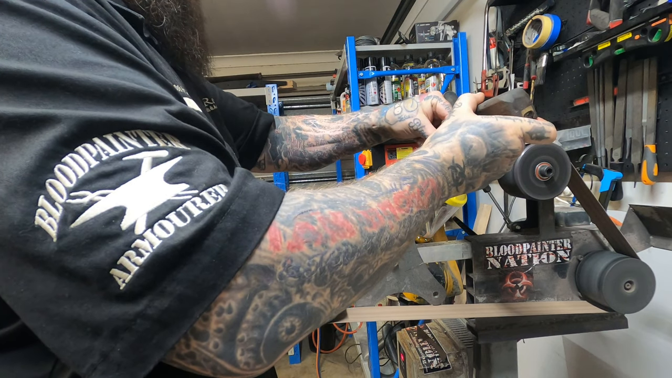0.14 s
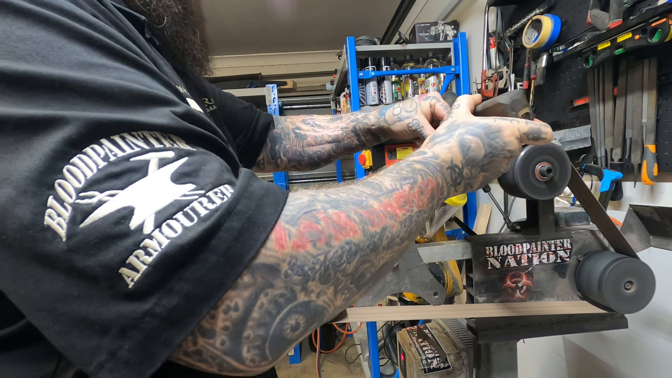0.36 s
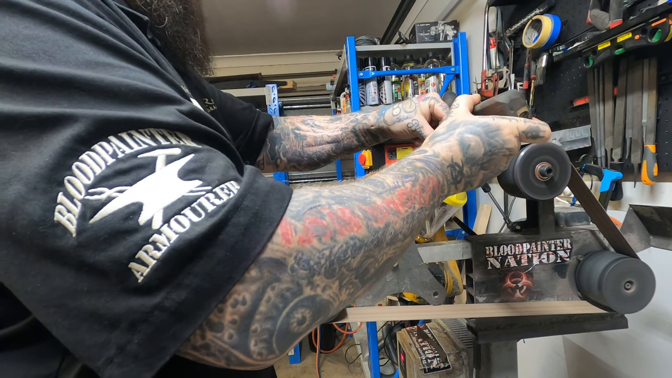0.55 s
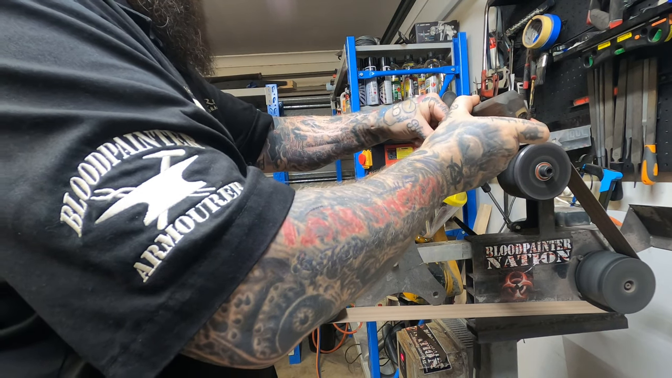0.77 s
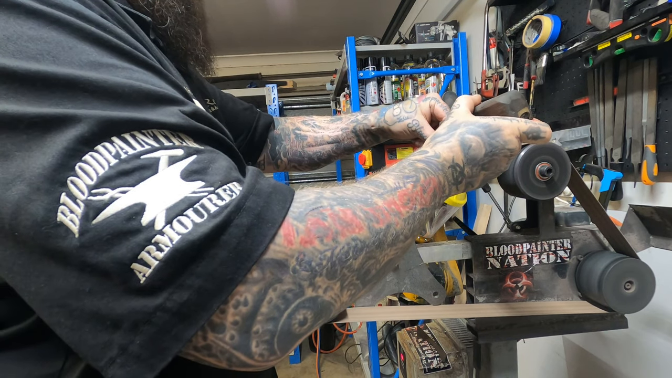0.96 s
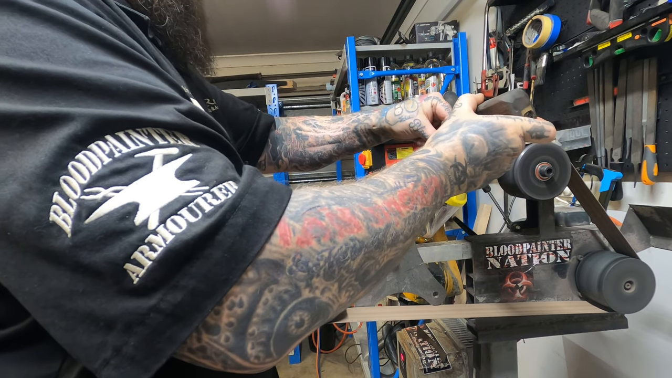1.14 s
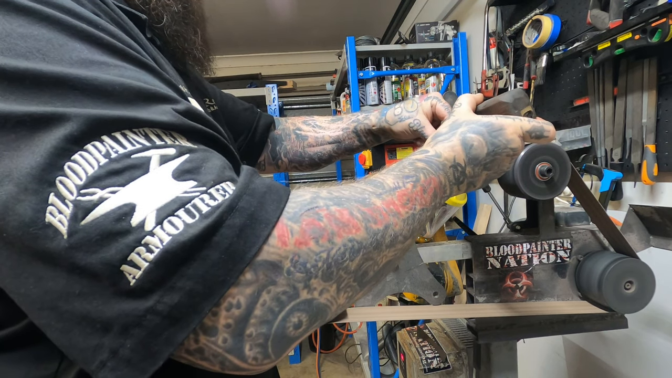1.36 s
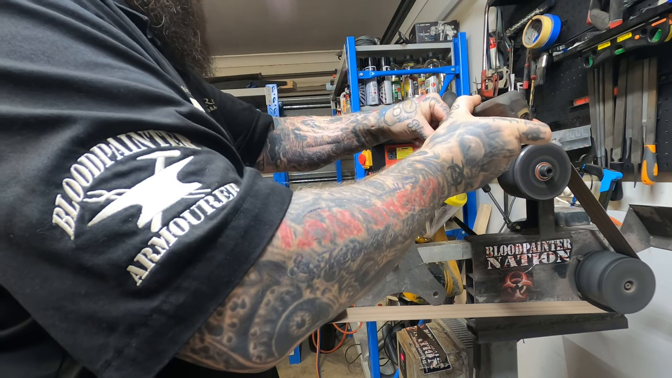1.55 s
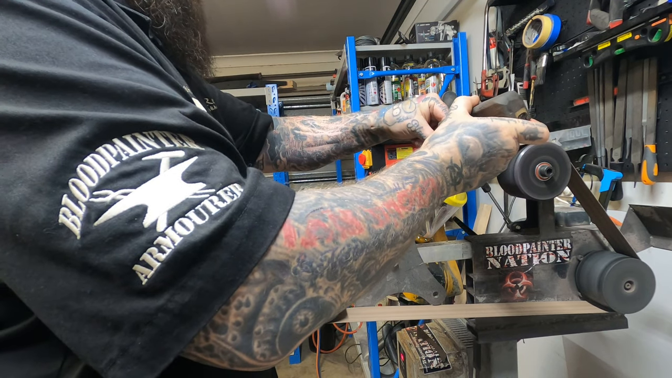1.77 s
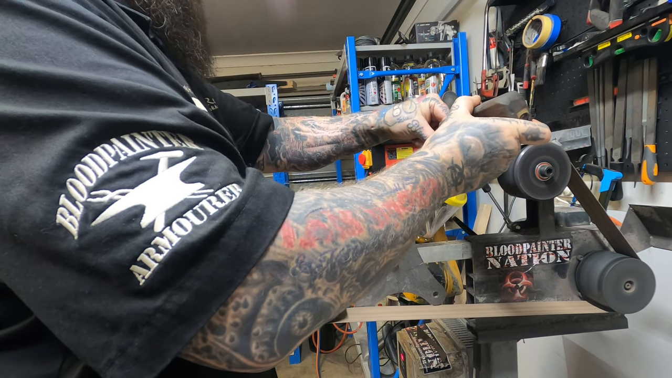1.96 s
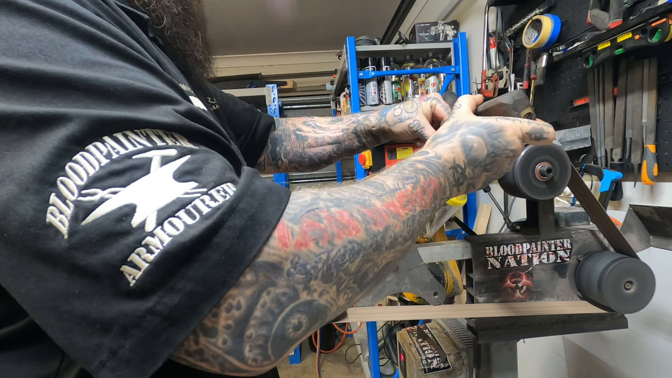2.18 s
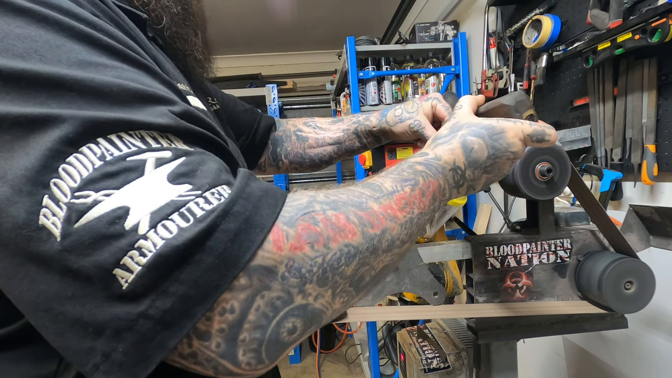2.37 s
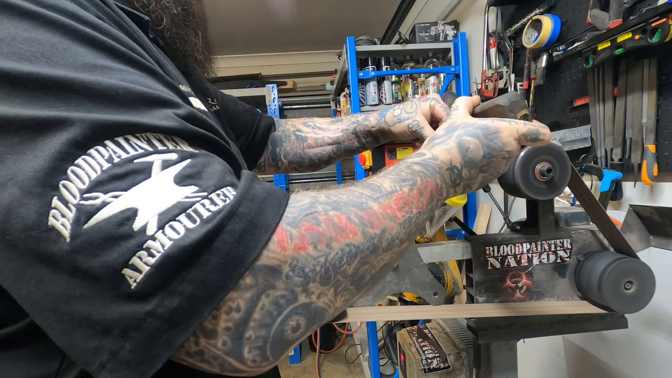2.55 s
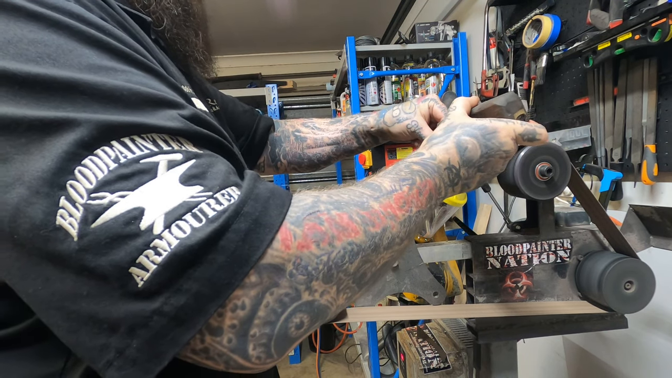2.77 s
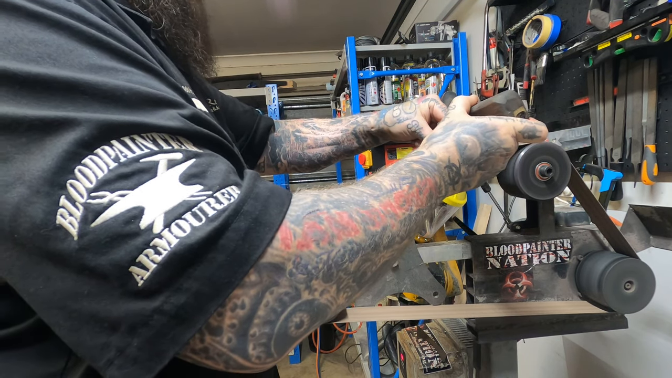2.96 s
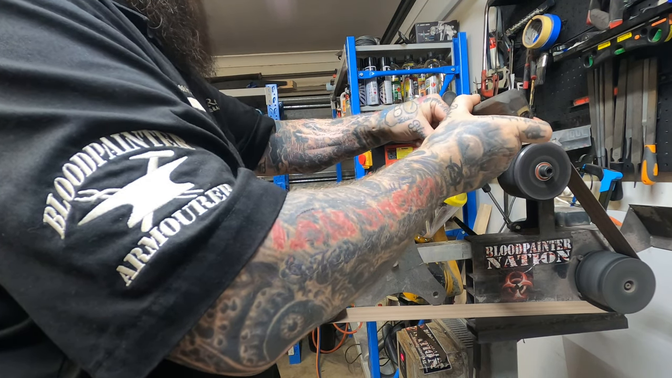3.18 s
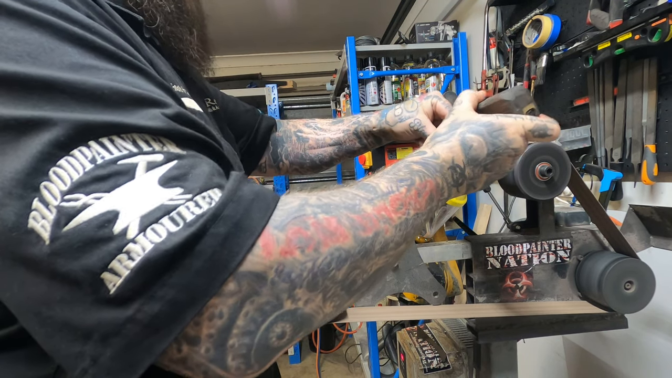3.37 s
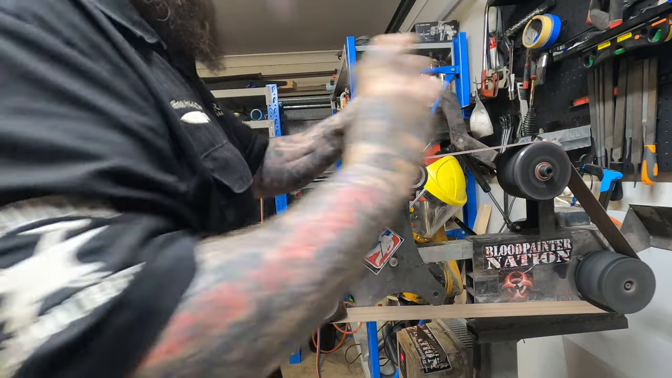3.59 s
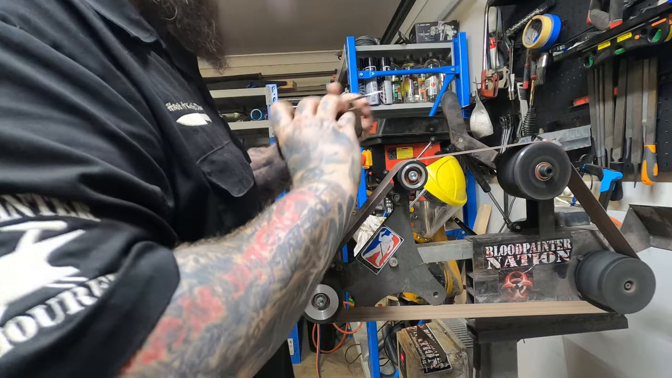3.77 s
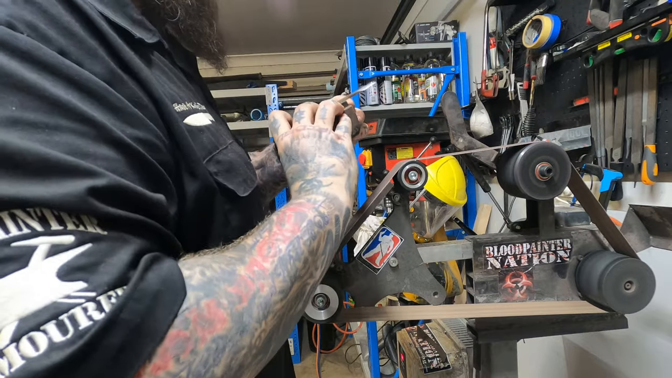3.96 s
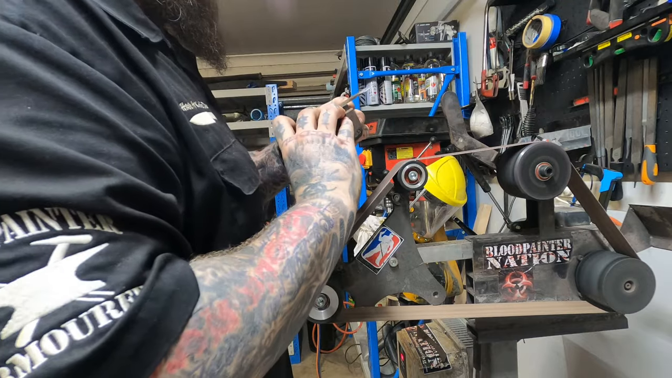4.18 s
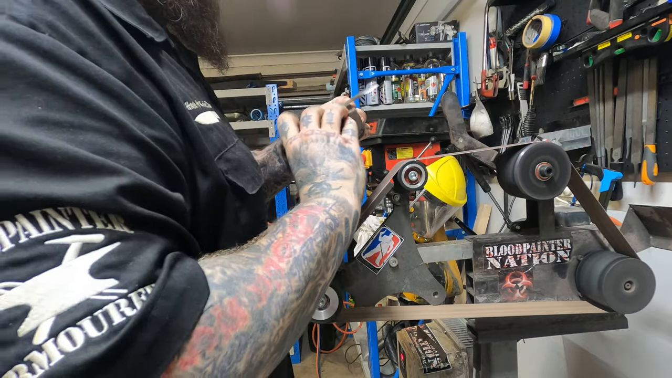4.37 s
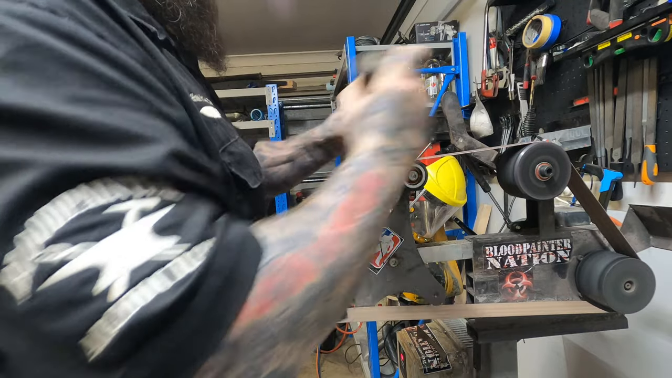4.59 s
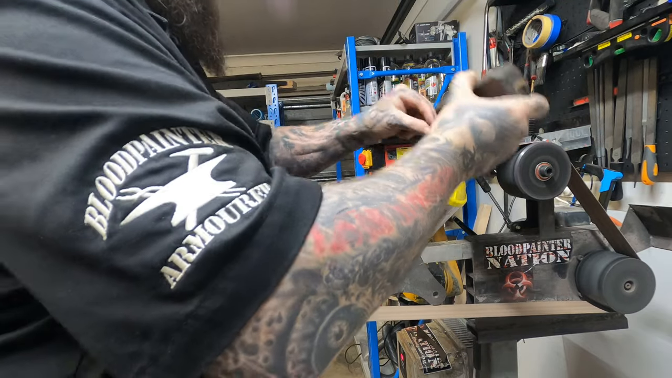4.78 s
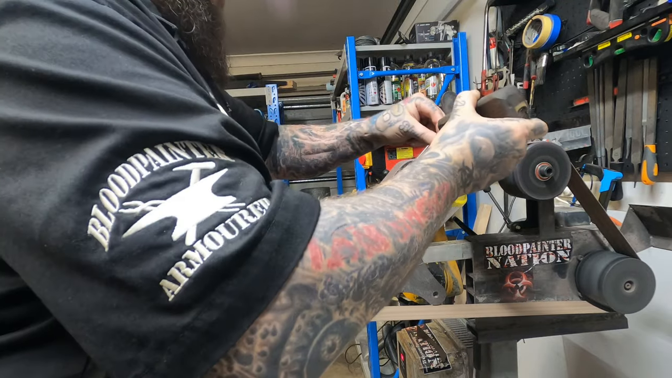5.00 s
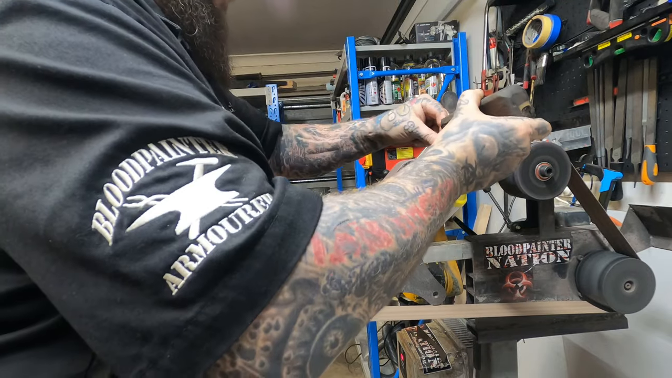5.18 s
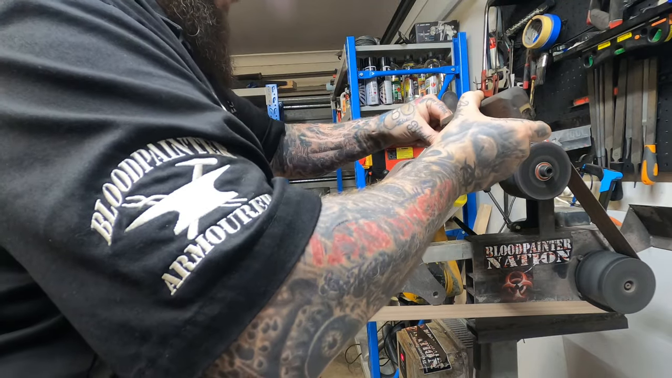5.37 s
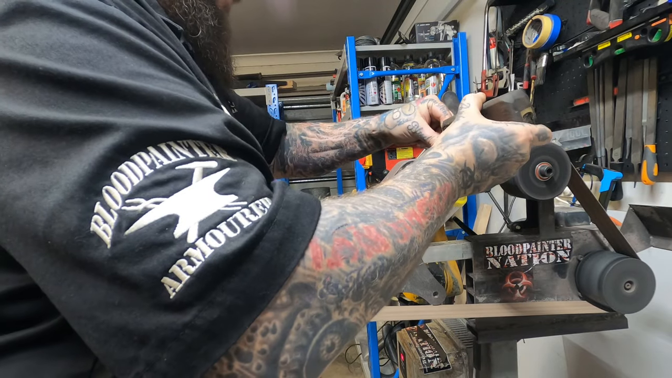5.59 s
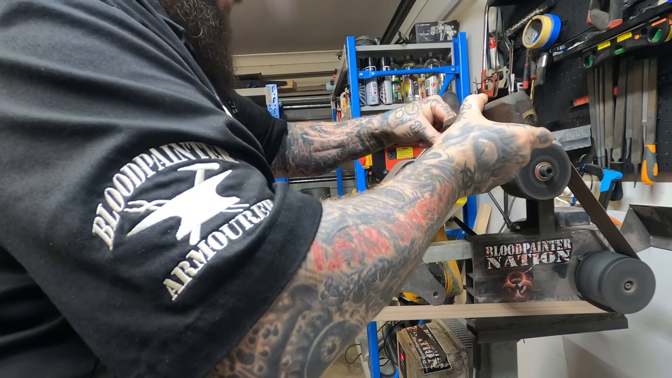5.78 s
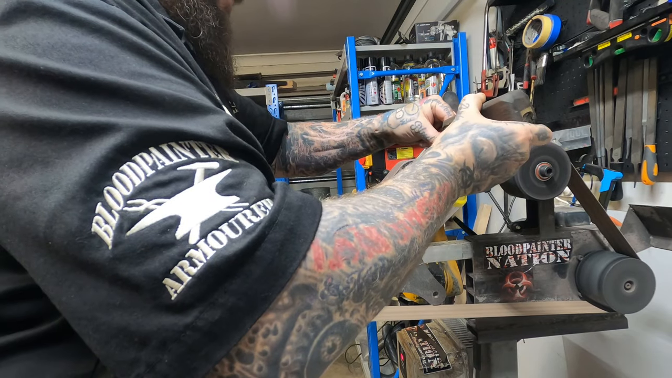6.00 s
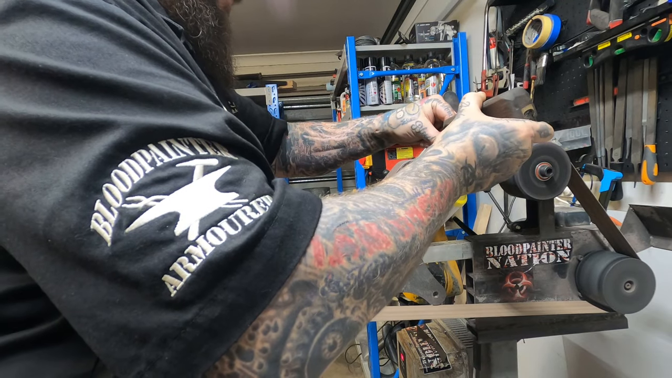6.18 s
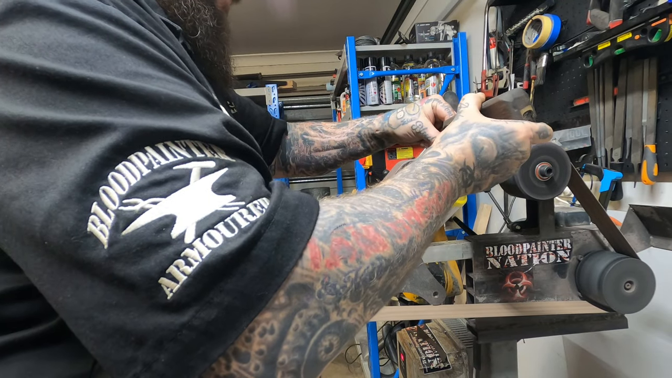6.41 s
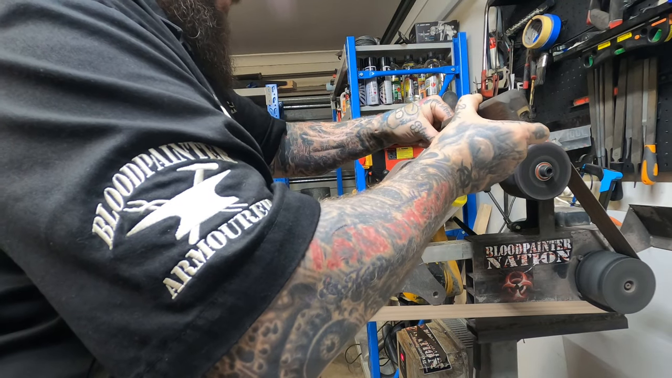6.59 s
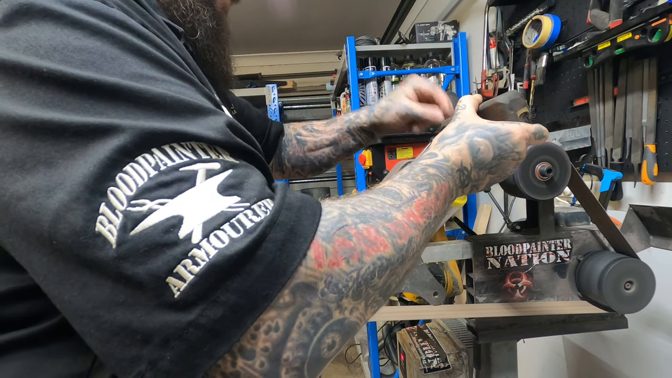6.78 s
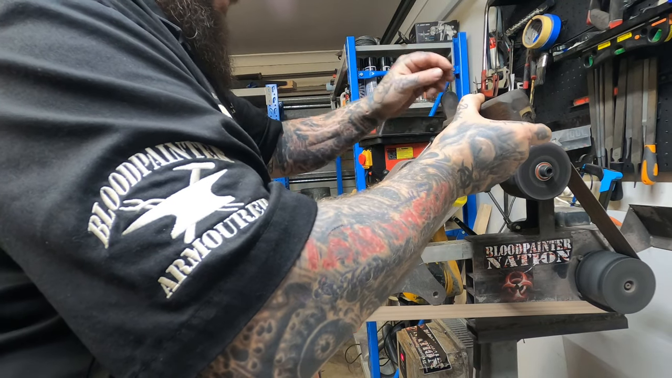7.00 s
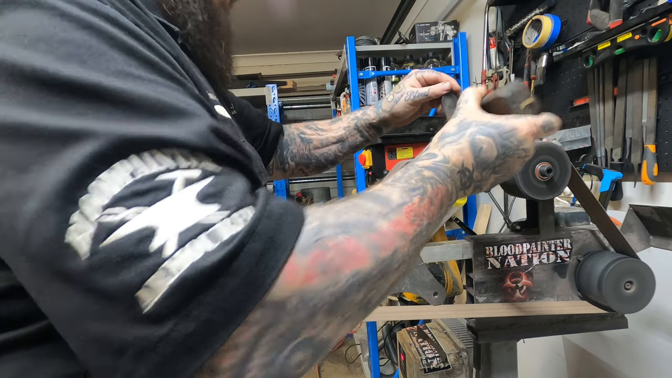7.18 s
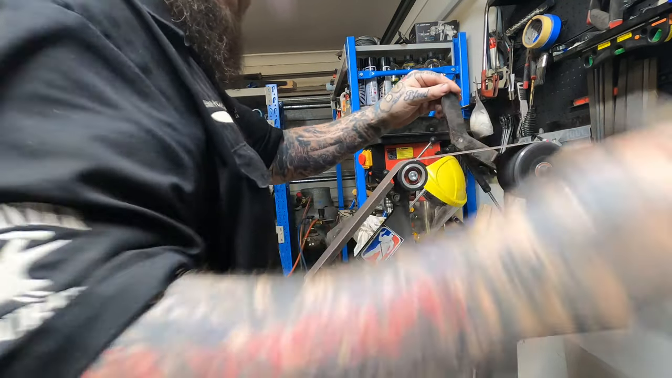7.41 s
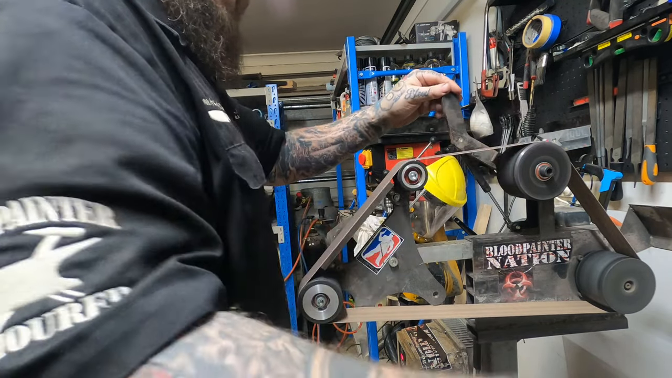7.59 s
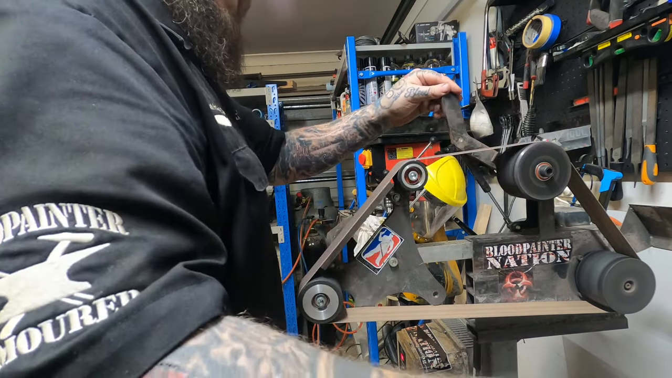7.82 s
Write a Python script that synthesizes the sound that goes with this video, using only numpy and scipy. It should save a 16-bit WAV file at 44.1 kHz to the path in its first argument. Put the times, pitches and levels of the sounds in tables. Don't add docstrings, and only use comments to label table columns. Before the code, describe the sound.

A belt grinder is already running at full speed, heard close in a workshop. Its dense, harsh mid-high roar has a rapid wheel rattle, a cluster of whining tones around three to four kilohertz, and a belt pattern repeating about twelve times a second. From 0 to 3.4 seconds, steel pressed on the belt adds a steady, gritty high hiss over a fading low hum. At about 3.45 the blade lifts: the hiss thins, the whine stands out, and pitch recovers almost imperceptibly. Soft low shudders bump around 3.9 and 4.5. A faint graze begins near 5.1, with the roar swelling slightly. From 5.55 to 7.2 a second pass scrapes brightly, strongest at first, then easing unevenly, with a low throb. After 7.25 the bare grinder continues roaring to the end at 7.85, without stopping.

```python
import sys
import numpy as np
from scipy import signal
from scipy.fft import rfft, irfft
from scipy.io import wavfile
from scipy.ndimage import uniform_filter1d, map_coordinates

SR = 44100
rng = np.random.default_rng(int(sys.argv[2]) if len(sys.argv) > 2 else 0)


def materialize(psi):
    bounded = np.clip(np.atleast_2d(psi).T, -1, 1)
    quanta = np.round(bounded * 32767).astype(np.int16)
    wavfile.write(sys.argv[1], SR, quanta)


def ratio(d):
    e = np.asarray(d, float) / 20
    return 10 ** e


N = 346185

SIZE, HOP = 1024, 256
HZ = np.fft.rfftfreq(SIZE, 1 / SR)[:, None]

# time in seconds, stance (0 first pass, 1 blade lifted, 2 second pass).
STANCES = [
    (0, 0),
    (3.39, 0),
    (3.46, 1),
    (5.45, 1),
    (5.65, 2),
    (7.17, 2),
    (7.25, 1),
    (7.85, 1),
]
# frequency in Hz, phase in
LEFT_PHASE = [(0, 0), (3100, -1.16), (4390, -2.5), (5600, -1.5), (7320, -4.5), (8010, -11), (8610, -10),
              (15300, -7.5)]


def evened(x):
    return x / np.sqrt(np.mean(abs(x) ** 2) + 1e-20)


def on_log_hz(points, hz):
    f, value = np.transpose(points)
    return np.interp(np.log(hz + 1), np.log(f + 1), value)


def over_time(rows, t):
    rows = np.array(rows)
    return np.interp(t, rows[:, 0], rows[:, 1])


def spectra(x):
    return signal.stft(x, nperseg=SIZE, noverlap=SIZE - HOP)[2]


def resonances_db(rows):
    return sum(np.array(db) / (1 + (2 * (HZ - hz) / width) ** 2) for hz, width, *db in rows)


def repeating(cycles, keep, uneven_db):
    size = round(N / cycles[-1])
    fresh = rng.standard_normal((2, int(cycles[-1]) + 2, size))
    renewal = np.sqrt(1 - keep ** 2)
    laps = signal.lfilter([renewal], [1, -keep], fresh, axis=1, zi=keep * fresh[:, :1])[0]
    order_gain = ratio(uneven_db * rng.standard_normal(size // 2 + 1))
    laps = irfft(rfft(laps) * order_gain, size)
    return np.array([map_coordinates(one.ravel(), [cycles * size], order=3) for one in laps])


def ports(z, db):
    # frequency in Hz, likeness of the two ports from 0 to 1.
    likeness = [(60, 0.96), (500, 0.79), (2000, 0.92), (4000, 0.92), (6000, 0.7), (8000, 0.16), (12000, .2)]
    # frequency in Hz, left over right in dB.
    lean = [(60, 2), (300, -2), (700, -1.1), (1200, -0.5), (1800, 0.5), (2700, 3), (3700, 5), (4400, -0.7),
            (5800, -2), (7000, -1.8), (7800, -9.5), (8700, -21), (12000, -14.5), (15000, -9)]
    same = np.clip(on_log_hz(likeness, HZ), 0, 1)
    left = ratio(on_log_hz(lean, HZ) / 2) * np.exp(1j * np.interp(HZ, *np.transpose(LEFT_PHASE)))
    right = 1 / abs(left)
    mean = np.sqrt(abs(left * same + right) ** 2 + abs(left) ** 2 * (1 - same ** 2)) / 2
    left_field = same * z[0] + np.sqrt(1 - same ** 2) * z[1]
    return np.array([left * left_field, right * z[0]]) / mean * ratio(db)


def band_level(z, lo, hi):
    band = (HZ[:, 0] > lo) & (HZ[:, 0] < hi)
    power = (abs(z.mean(0)[band]) ** 2).sum(0) * 4 / 3
    return np.sqrt(uniform_filter1d(power, size=120))


def roar(t, stance, wheel, lap, air):
    # frequency in Hz, roar in dB per Hz.
    colour = [(47, -45), (80, -9.5), (130, -24.5), (162, -13.5), (343, -14.5), (499, -22), (1470, -8.5),
              (2290, -6), (2670, -3), (3720, -1.5), (4150, -13), (5070, -6.5), (6180, -12), (7050, -10.5),
              (15600, -39)]
    # centre in Hz, width in Hz, then dB in
    humps = [(420, 49, -1.5, 2.5, 2), (600, 350, 0, 3.2, -0.5), (1037, 113, 6.5, 3, 3.5),
             (1360, 136, -5.5, -0.5, -2), (1655, 200, 5.5, 5.5, 7.5), (1830, 200, -3.5, -4, -2.2),
             (2214, 71, 12, -1, 8), (2520, 170, 3.5, 2.5, 1.5), (2890, 120, -9.5, -7.5, -2),
             (3284, 310, 6, 1.6, 5), (3725, 76, 6.5, 1.5, .3), (3972, 106, 14.5, 4, 6.5),
             (4400, 300, -4, 1, 3.5), (4960, 320, 0.5, -3.5, 1.5),
             (5900, 240, 3, 0, 3.5), (6990, 130, 1, 5, 0), (790, 100, -1.2, 2, 3.5),
              (6200, 150, -4.5, -4.5, -6), (8100, 460, -3, 1, -4), (12400, 2200, -4, 3.5, 5.5),
              (16000, 1800, 1, -2, 0), (115, 30, -8, -3, -4), (716, 35, 2.5, 4, 5),
              (4160, 120, 2, 4.5, 3.5), (15500, 600, -4, -9, -2), (4750, 200, 1.5, 2, -2),
              (5200, 200, -2.5, 3.5, 1.5), (6350, 200, -3, 2.5, -4)]
    # frequency in Hz, wheel pattern's share of the power.
    of_wheel = [(300, .03), (900, .22), (2500, .3), (4500, .45), (7000, .33), (11000, .1)]
    # frequency in Hz, belt lap pattern's share of the power.
    of_lap = [(70, .05), (150, .4), (1200, .4), (2500, .15), (8000, .12), (12000, .03)]
    roar_db = [-24, -26, -25]
    wheel_share = np.clip(on_log_hz(of_wheel, HZ), 0, .48)
    lap_share = np.clip(on_log_hz(of_lap, HZ), 0, .48)
    z = np.sqrt(wheel_share) * wheel + np.sqrt(lap_share) * lap
    z = z + np.sqrt(1 - wheel_share - lap_share) * air
    z = ports(z, on_log_hz(colour, HZ) + resonances_db(humps) @ stance)
    approach_db = 1.3 * np.interp(t, (5.07, 5.3, 5.45, 5.65), [0, 1, 1, 0])
    return z / band_level(z, 2330, 4800) * ratio(np.array(roar_db) @ stance + approach_db)


def pressure_db(t):
    # time in seconds, hiss in dB.
    passes = [
        [(0, -41.5), (.1, -40), (.7, -39.5), (3, -39.5), (3.39, -41.5)],
        [(5.54, -42), (5.6, -38.5), (5.95, -38.5), (6.55, -42.5), (6.75, -41), (7, -43), (7.18, -42.5)],
    ]
    bare_db, let_go_s = -43.5, 0.08
    rows = []
    for one in passes:
        rows += [(one[0][0] - let_go_s, bare_db), *one, (one[-1][0] + let_go_s, bare_db)]
    return over_time(rows, t)


def scrape(t, stance, lap, air):
    # frequency in Hz, scrape in dB per Hz.
    colour = [(1500, -18), (2500, -0.5), (3500, 1), (5000, -3), (7000, -1.5), (9000, -10.5), (12500, -12.5),
              (14500, -23.5), (16000, -29)]
    # centre in Hz, width in Hz, dB in first pass, dB in second pass.
    blade = [(4300, 57, 11, -8), (5120, 230, 6, 4), (5610, 100, 6, 10), (6060, 50, -4, 11),
             (6300, 51, 2, 13), (6780, 60, 1, 8), (7850, 90, -4, 11), (8560, 180, 8, 8.5),
             (10400, 190, 2, -1), (11500, 100, 0, 5)]
    # time in seconds, level in dB.
    touch = [
        (4.95, -60),
        (5.1, -29),
        (5.3, -31),
        (5.45, -29),
        (5.6, -58),
    ]
    lifted_hiss_db = -44.5
    power = np.maximum(ratio(2 * pressure_db(t)) - ratio(2 * lifted_hiss_db), 0)
    flicker_db = 1.06 * evened(uniform_filter1d(rng.standard_normal(len(t)), size=3))
    z = ports(0.55 * lap + 0.84 * air, on_log_hz(colour, HZ) + resonances_db(blade) @ stance[::2])
    graze = ports(air[::-1], -20 * np.log10(1 + (2 * (HZ - 3320) / 260) ** 2))
    graze *= ratio(over_time(touch, t)) / band_level(graze, 2000, 4200)
    return z / band_level(z, 9160, 15400) * np.sqrt(power) * ratio(flicker_db) + graze


def orders(rows, cycles, t, stance, waver_db, drift):
    # frequency in Hz, gain in dB.
    tone_gain = [(500, 0), (900, -2), (1250, 0), (3150, 0), (3280, -2.5), (3420, 1), (3770, 2), (3870, -1),
                 (4500, 0)]
    out, coarse = np.zeros((2, N)), np.arange(0, N, 16) / SR

    def spread(slow):
        return np.repeat(np.interp(coarse, t, slow), 16)[:N]

    chance = evened(uniform_filter1d(rng.standard_normal((len(rows), 3, len(t))), size=20))
    for (order, *db, pan_db), (swell, turn, part) in zip(rows, chance):
        hz = order * cycles[-1] * SR / N
        level_db = np.array(db) @ stance + on_log_hz(tone_gain, hz) + waver_db * swell
        level = 2 / np.sqrt(1 + ratio(2 * pan_db)) * spread(ratio(level_db))
        angle = 2 * np.pi * ((order * cycles + rng.random()) % 1) + spread(drift * order * turn)
        lead = np.interp(hz, *np.transpose(LEFT_PHASE)) + spread(0.31 * part)
        out[0] += ratio(pan_db) * level * np.cos(np.float32(angle + lead))
        out[1] += level * np.cos(np.float32(angle))
    return out


def wheel_whine(turns, t, stance):
    # wheel order, dB in first pass, lifted, second pass, left
    # over right in dB.
    whine = [(24, -55, -52, -54, 0), (30, -53, -51.5, -53, 0), (34, -51, -46, -49, -1),
             (40, -50, -45, -47, 0), (42, -49, -48, -46, 3), (51, -48, -43, -44, 1),
             (57, -39, -38, -45, 2), (64, -46, -39, -41, 3), (66, -43, -43, -42, 4),
             (70, -37, -36, -36, 2), (72, -40, -37, -37, 2), (76, -48, -40, -47, 1),
             (78, -40, -36, -37, 2), (80, -41, -40, -44, 2),
             (81, -37, -32, -31, 5), (84, -43, -36, -40, 2), (86, -42, -40, -38, 2), (87, -41, -41, -39, 6),
            (90, -44, -33, -36, 3), (96, -40, -35, -37, 6), (98, -39, -40, -39, 7), (99, -33, -34, -32, 7),
            (100, -35, -35, -33, 6), (102, -41, -36, -42, 2), (105, -39, -43, -41, 2),
            (132, -43, -38, -42, -5), (147, -43, -41, -47, -3), (153, -49, -42, -45, 2),
            (159, -50, -43, -51, -5), (178, -43, -44, -48, -4),
             (21, -63, -62, -53, 0)]
    return orders(whine, turns, t, stance, 1.6, .0045)


def belt_flap(laps, t, stance):
    # lap order, dB in first pass, lifted, second pass, left over right in dB.
    flaps = [(7.27, -57.5, -56, -61, -1), (10, -62, -61, -58, 2), (12.17, -55, -56, -53.5, 1),
             (13.96, -54.5, -55, -57, 0), (14.8, -57, -53.5, -58, -1), (17.05, -58, -58, -56, -1),
             (17.83, -61, -55, -54, 0), (22.27, -61.5, -55.5, -58.5, 0), (19.92, -53, -55, -56.5, 1),
             (24.7, -58, -52.5, -56, 3), (29.04, -75, -57, -55, 2), (29.97, -64, -54, -59, 0),
             (30.9, -67, -61, -58, 0), (32.3, -63, -62, -56, 5), (32.8, -64.5, -59, -59, 0),
             (35.16, -62.5, -59.5, -58, -1), (36.1, -61, -70, -65, -1), (37.4, -56.5, -61, -58.5, 6),
             (39.85, -59.5, -58, -62, -1)]
    return orders(flaps, laps, t, stance, 2.5, .015)


def splice(laps):
    # start in seconds, end in seconds, lap order of the tone, dB at start, dB at end.
    knocks = [
        (0, 3.4, 35.7, -47.5, -61),
        (5.4, 7.2, 31.8, -49, -46.5),
    ]
    t = np.arange(N) / SR
    strongest_s, depth, edge_s = 6.48, .9, .08
    throb = 1 + depth * np.cos(2 * np.pi * (laps - laps[round(strongest_s * SR)]))
    tone = np.zeros(N)
    for start, end, order, *db in knocks:
        gate = np.clip(np.minimum(t - start, end - t) / edge_s + 1, 0, 1)
        tone += gate * ratio(np.interp(t, [start, end], db)) * np.cos(2 * np.pi * order * laps)
    return throb * tone


def thud(laps):
    # centre in seconds, level in dB, frequency in Hz.
    shudders = [(.1, -55, 59), (.7, -56, 59), (1.3, -51, 59), (3.86, -43, 60), (4.27, -53, 63),
                (4.47, -47, 64), (4.97, -48, 61), (5.47, -51, 62), (5.86, -58, 62), (6.08, -50, 63),
                (6.42, -48, 60.4), (7.04, -51, 61), (7.32, -51, 63), (7.46, -48, 60.3), (7.7, -52, 60)]
    hum_order, shudder_s, low_air_db = 4.917, .065, -63
    low_band = signal.butter(1, [42, 72], "band", fs=SR, output="sos")
    air = signal.sosfilt(low_band, rng.standard_normal((3, N)))
    air = evened(air[0] + 0.97 * air[1:])
    t = np.arange(N) / SR
    held = np.clip(1 - over_time(STANCES, np.minimum(t, 4)), 0, 1)
    hum = ratio(-45.5 - 1.5 * np.minimum(t, 3.4) - 11 * (1 - held))
    span, lumps = hum * np.cos(2 * np.pi * hum_order * laps), np.zeros(N)
    for s, db, hz in shudders:
        first = max(round((s - 4 * shudder_s) * SR), 0)
        near = slice(first, round((s + 4 * shudder_s) * SR))
        since = t[near] - s
        lump = ratio(db) * np.exp(-.5 * (since / shudder_s) ** 2)
        span[near] += 1.3 * lump * np.cos(2 * np.pi * (hz * since + hum_order * laps[round(s * SR)]))
        lumps[near] += lump
    return span + (ratio(low_air_db) + 0.37 * lumps + 0.34 * hum) * air


def scene():
    # time in seconds, speed lost in turns per second.
    sag = [
        (0, .045),
        (2.8, .079),
        (3.36, .077),
        (3.52, 0),
        (5.25, 0),
        (5.95, .05),
        (6.6, .063),
        (7.12, .059),
        (7.3, 0),
    ]
    free_turns_per_s, laps_per_turn = 37.965, 11.816 / 37.886
    turns = np.cumsum(free_turns_per_s - over_time(sag, np.arange(N) / SR)) / SR
    laps = turns * laps_per_turn
    wheel = evened(spectra(repeating(turns, .95, 2.2)))
    lap = evened(spectra(repeating(laps, .88, 3)))
    air, hiss = (evened(spectra(rng.standard_normal((2, N)))) for _ in range(2))
    t = np.arange(air.shape[2]) * HOP / SR
    stance = np.maximum(1 - abs(over_time(STANCES, t) - np.arange(3)[:, None]), 0)
    z = roar(t, stance, wheel, lap, air) + scrape(t, stance, lap[::-1], hiss)
    noise = signal.istft(z, nperseg=SIZE, noverlap=SIZE - HOP)[1][:, :N]
    tones = wheel_whine(turns, t, stance) + belt_flap(laps, t, stance)
    return noise + tones + splice(laps) + thud(laps)


def roll_off(x):
    return signal.sosfilt(signal.butter(12, 15780, fs=SR, output="sos"), x)


def record(dry):
    x = signal.sosfilt(signal.butter(1, 22, "high", fs=SR, output="sos"), dry)
    ceiling = .62
    x = x / (1 + abs(x / ceiling) ** 6) ** (1 / 6)
    return roll_off(x)


dry = scene()
out = record(dry)
materialize(out)
```